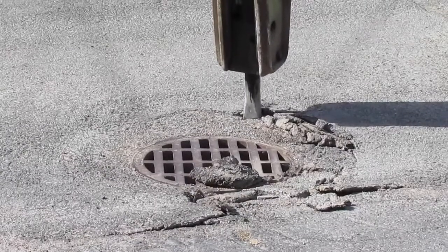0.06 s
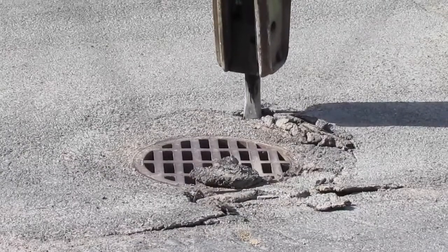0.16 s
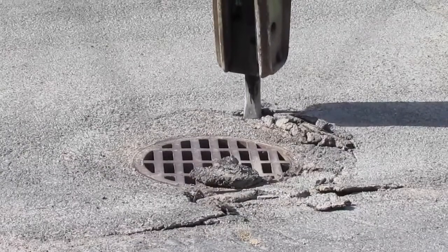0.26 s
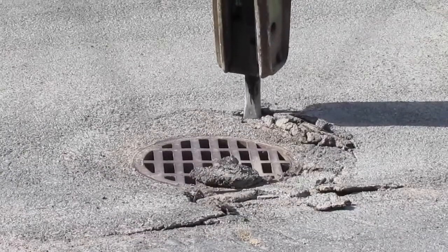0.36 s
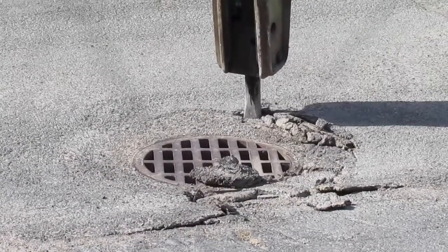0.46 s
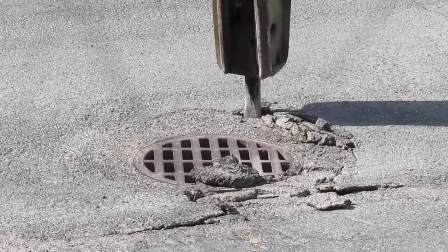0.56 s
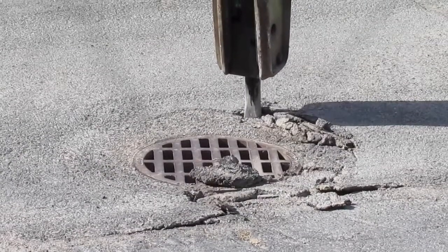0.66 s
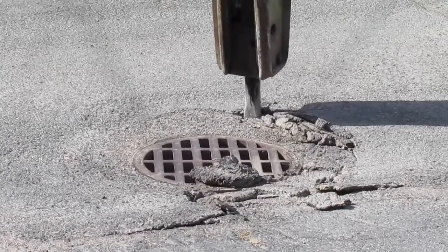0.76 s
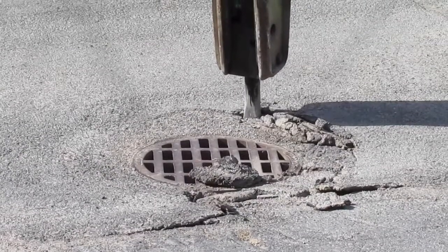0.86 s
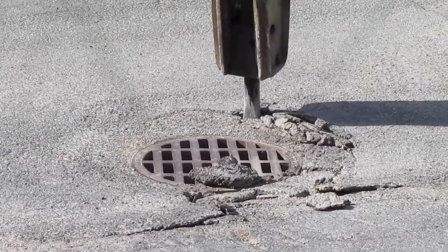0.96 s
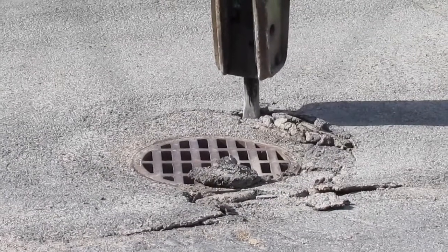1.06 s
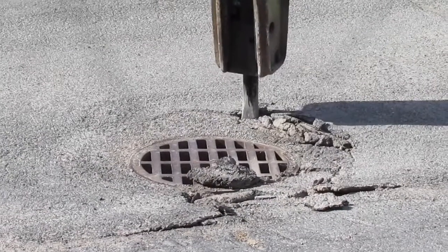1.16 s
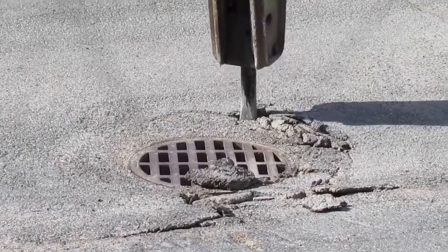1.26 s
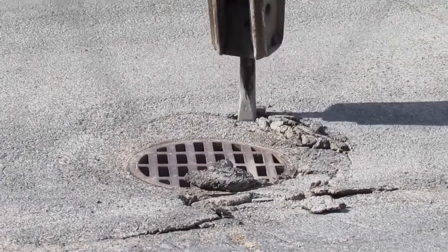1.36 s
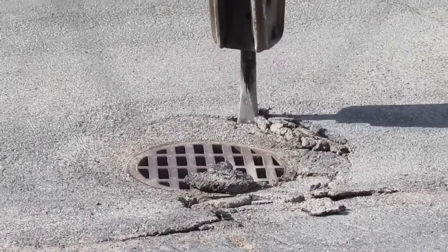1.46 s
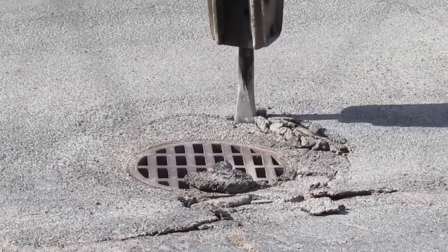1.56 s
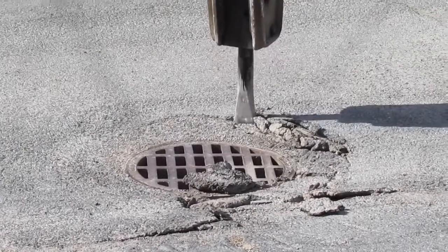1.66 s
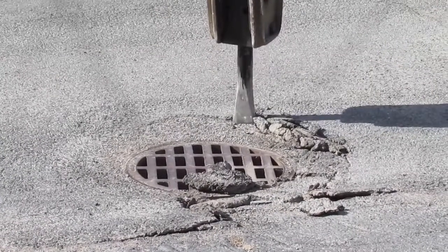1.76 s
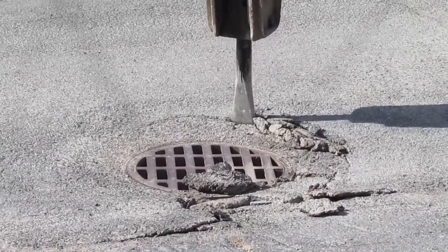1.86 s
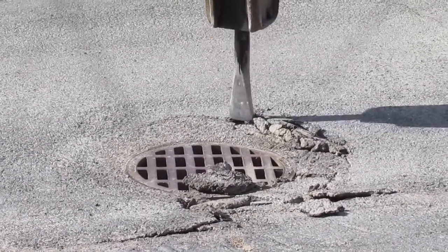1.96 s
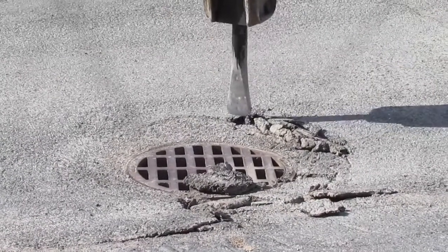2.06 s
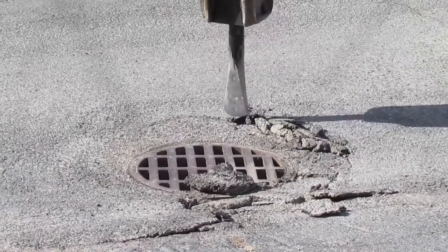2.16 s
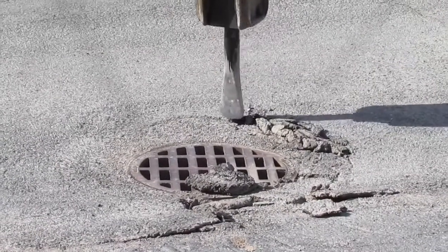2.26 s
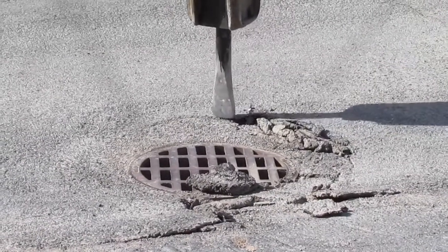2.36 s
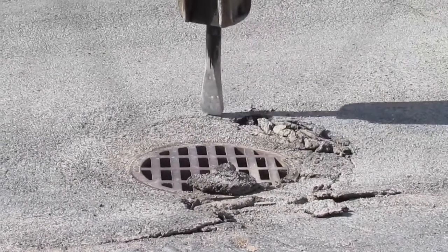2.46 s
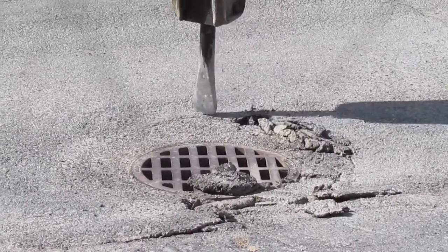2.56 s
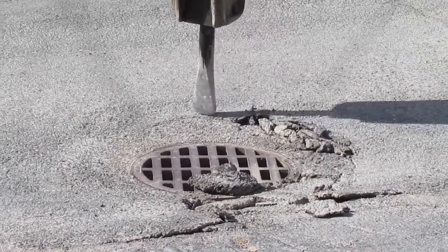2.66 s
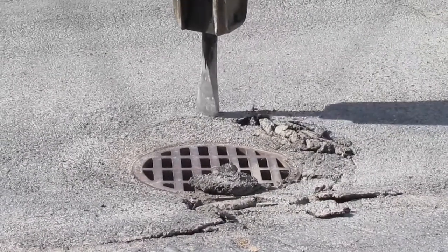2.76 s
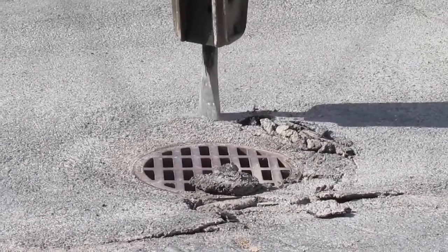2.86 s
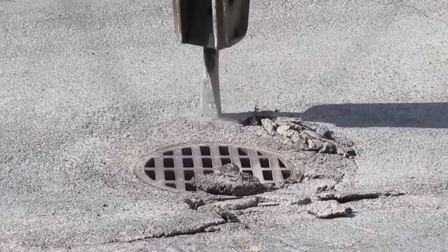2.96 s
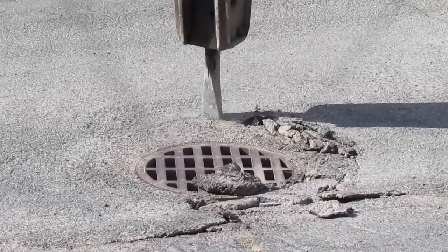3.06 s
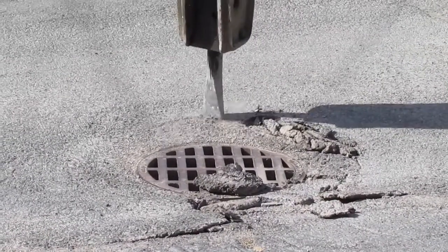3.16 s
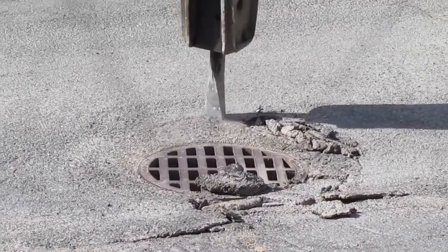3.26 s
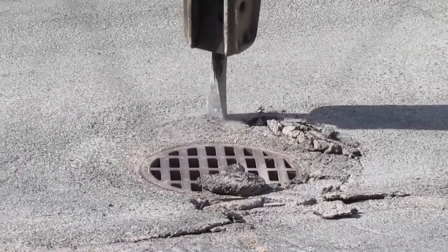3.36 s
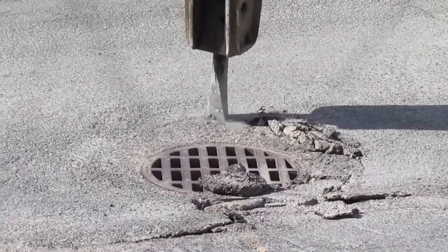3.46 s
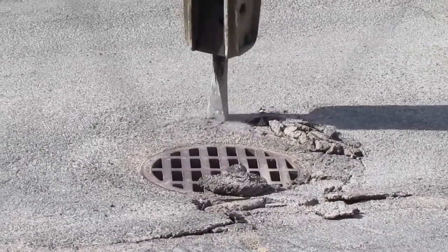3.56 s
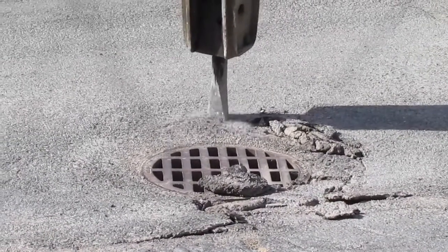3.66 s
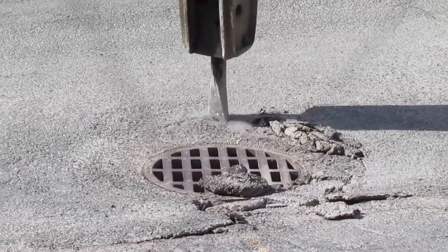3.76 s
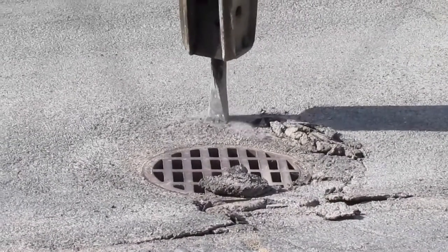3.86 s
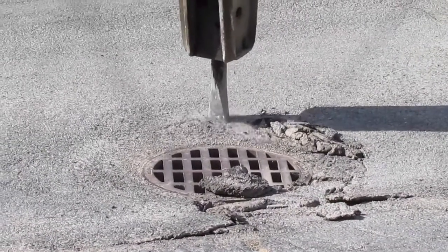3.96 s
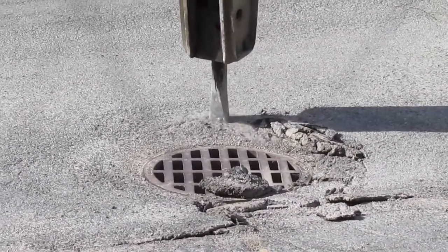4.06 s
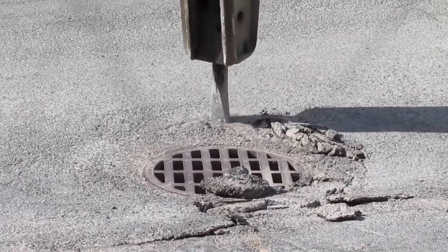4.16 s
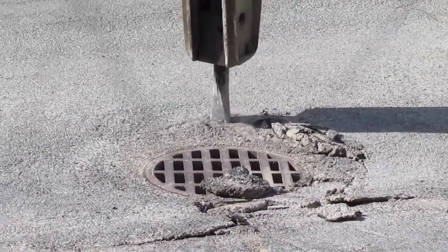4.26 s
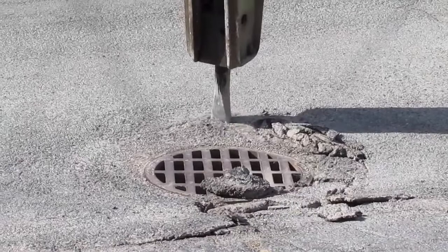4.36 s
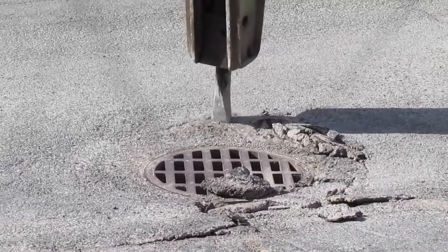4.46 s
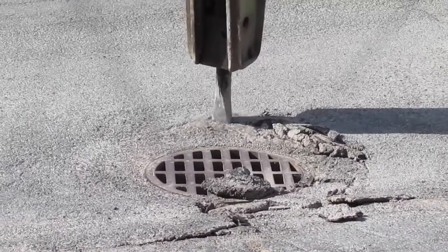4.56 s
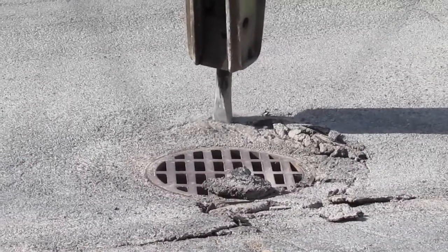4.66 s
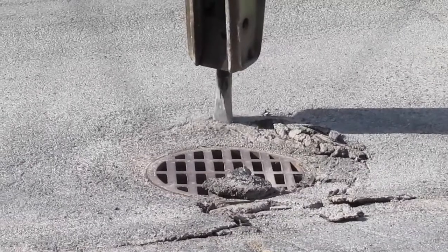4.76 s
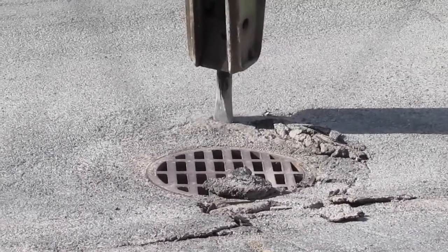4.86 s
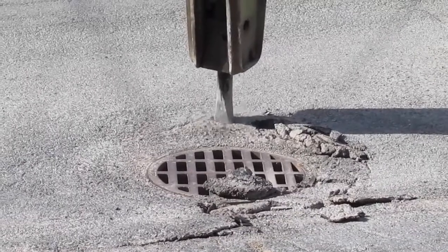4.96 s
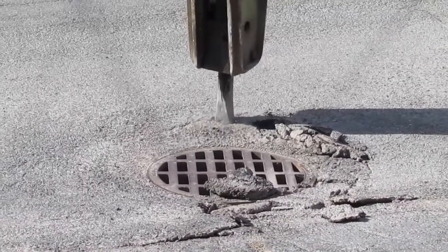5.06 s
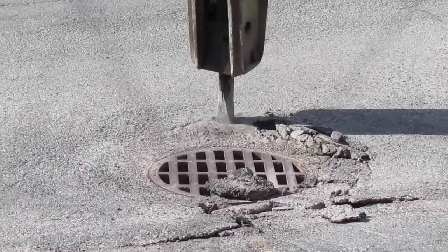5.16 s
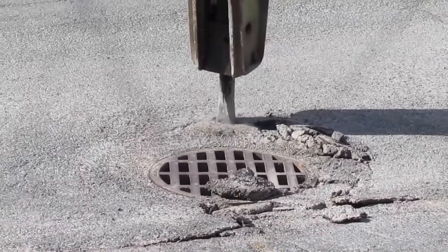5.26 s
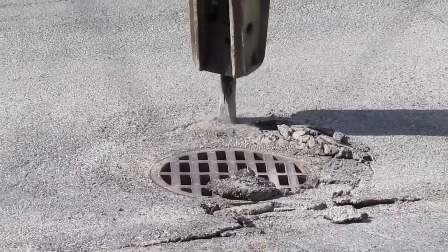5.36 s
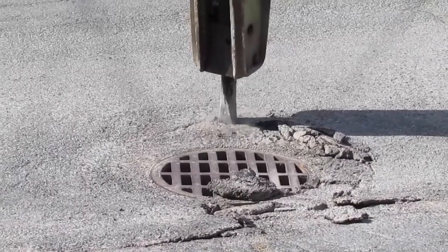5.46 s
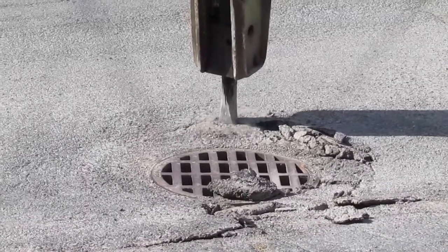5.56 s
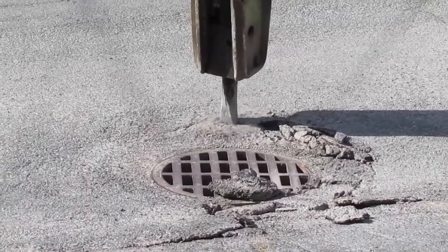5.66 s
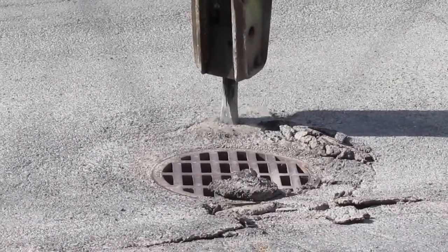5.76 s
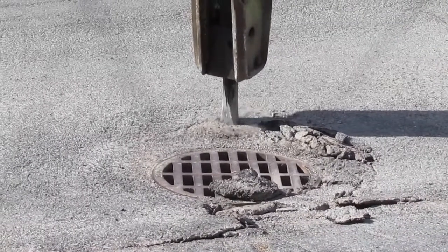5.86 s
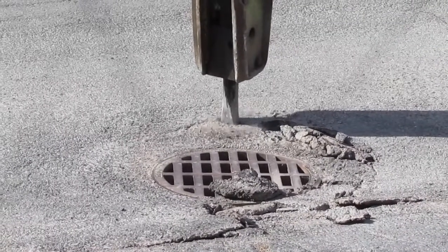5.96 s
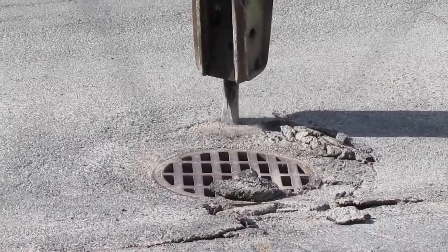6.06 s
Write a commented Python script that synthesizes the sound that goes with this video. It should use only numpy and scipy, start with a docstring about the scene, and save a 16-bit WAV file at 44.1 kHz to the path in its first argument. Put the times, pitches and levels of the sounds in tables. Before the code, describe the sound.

A hydraulic jackhammer is already pounding a road, about eleven sharp, ringing steel blows a second, each with a short street echo. It stops at about 0.7 seconds, leaving the much quieter hum and clatter of a diesel engine with a faint hydraulic hiss. Between 0.7 and 1.4 seconds the machine's arm gives a few dull metal knocks, while small stones and sand trickle lightly. A couple more stones drop just after 2 seconds, and two more knocks come near 2.5 seconds. Low wind buffets the microphone from around 1.9 seconds, peaking near 2.7 as the engine hum swells. At 2.8 seconds the chisel comes down with a clank and the hammering resumes over a crunch of breaking asphalt. The crunch fades by about 4.5 seconds, while the loud, even pounding continues to the end at around 6 seconds.

```python
"""Hydraulic breaker on asphalt

A breaker on an excavator arm pounds a chisel into the road, stops, lifts, moves and starts again.
Each blow rings the housing and the chisel in nearly the same way, drifting as the chisel sinks. Between
bursts the diesel hums, grit trickles, the arm's pins knock and wind buffets the microphone ports."""
import sys
import numpy as np
from scipy import signal
from scipy.fft import rfft, irfft, next_fast_len
from scipy.io import wavfile
from scipy.ndimage import uniform_filter1d, map_coordinates

SR = 44100
rng = np.random.default_rng(int(sys.argv[2]) if len(sys.argv) > 2 else 0)


def wav_record(signal):
    """Record a signal, one row per channel, as 16-bit PCM in the file named by sys.argv[1]."""
    frames = np.transpose(np.atleast_2d(signal))
    bounded = np.clip(frames, -1, 1)
    # unit amplitude maps onto the largest positive 16-bit level
    quanta = np.round(bounded * 32767).astype(np.int16)
    wavfile.write(sys.argv[1], SR, quanta)


N = 269451


def amp(db):
    return 10 ** (np.asarray(db) / 20)


def unit(x):
    return x / np.sqrt(np.mean(x ** 2) + 1e-20)


def along(points, hz):
    """Reads (frequency, value) points on a log axis."""
    freqs, values = np.transpose(points)
    return np.interp(np.log(hz + 1), np.log(freqs + 1), values)


def curves(rows):
    """One automation curve for each column after the time."""
    times, *columns = np.transpose(rows)
    return [np.interp(np.arange(N) / SR, times, column) for column in columns]


def wobble(rate):
    """A smooth random curve, rate knots a second."""
    return map_coordinates(rng.standard_normal(int(N * rate / SR) + 4), [np.arange(N) * rate / SR])


def filtered(x, response):
    """Zero-phase EQ; response gives the gain at each frequency."""
    size = next_fast_len(x.shape[-1] + 2048)
    return irfft(rfft(x, size) * response(np.fft.rfftfreq(size, 1 / SR)), size)[..., :x.shape[-1]]


def coloured(x, spectrum):
    return unit(filtered(x, lambda hz: amp(along(spectrum, hz))))


def drifting(size, keep):
    """Random rows, each keeping a share of the one before."""
    rows = rng.standard_normal(size)
    rows[1:] *= np.sqrt(1 - keep ** 2)
    return signal.lfilter([1], [1, -keep], rows, axis=0)


def fade(t, rise, t60):
    """Attack from t = 0, decaying 60 dB in t60 seconds."""
    t = np.maximum(t, 0)
    return (1 - np.exp(-t / rise)) * amp(-60 * t / t60)


def placed(times, sounds):
    """Lays each row of sounds on the timeline."""
    at = np.round(times * SR).astype(int)[:, None] + np.arange(sounds.shape[1])
    return np.bincount(at.ravel(), sounds.ravel(), N + sounds.shape[1])[:N]


# Stereo image of the noise beds: (frequency [Hz], left-right correlation [0-1])
BED_LIKENESS = [(60, 0.69), (150, 1), (380, 0.95), (950, 1), (2380, 0.77), (5980, 0.69), (15000, 0.3)]


def rush(spectrum, patchy_db):
    """Stereo noise bed of rms 1, mottled in time and frequency."""
    bins = signal.stft(rng.standard_normal((2, N)), nperseg=512)[2]
    patches = uniform_filter1d(uniform_filter1d(rng.standard_normal(bins.shape[1:]), 6, 0), 12, 1)
    pair = signal.istft(bins * amp(patchy_db * unit(patches)), nperseg=512)[1][:, :N]
    width = lambda hz: np.arccos(along(BED_LIKENESS, hz)) / 2
    eq = lambda hz: amp(along(spectrum, hz)) * [np.cos(width(hz)), np.sin(width(hz))]
    mid, side = filtered(pair, eq)
    return unit(np.array([mid + side, mid - side]))


# Diesel faders: (time [s], hum [dB], clatter [dB])
ENGINE_LEVELS = [(0, -47.5, -33.5), (.3, -46, -36.5), (.6, -47, -36), (.75, -47, -43), (.95, -43.5, -41.5),
                 (1.3, -41.5, -39.5), (1.87, -41.5, -38.5), (2.55, -37.5, -36.5), (2.68, -34, -35.5),
                 (2.81, -41, -34), (3, -49, -32.5), (3.5, -47, -39), (4.4, -47.5, -38), (6.11, -47.5, -44)]
# Hydraulic pump tone: (time [s], pitch [Hz], level [dB])
PUMP_TONE = [(0, 316.2, -54), (0.75, 318.7, -52.5), (0.91, 323.7, -47.5), (1.21, 307, -54),
             (1.43, 306.8, -44), (1.5, 313.4, -55), (1.74, 309, -49), (1.91, 307.9, -48.5),
             (2.31, 319.2, -42.5), (2.74, 319.4, -39), (2.82, 316, -47), (3.6, 316, -52), (4.5, 317, -57),
             (6.11, 319.3, -55)]
# Partials of fan, pump and firing, a list each: (ratio to pump pitch, gain [dB])
SHAFT_ORDERS = [
    [(.566, 0)],
    [(1, 1.5), (2, -9), (2.5, -10), (3, -10)],
    [(1 / 3, 0), (1 / 6, -5), (2 / 3, -5)],
]
# EQs of diesel rumble, diesel clatter and hydraulic hiss: (frequency [Hz], gain [dB])
RUMBLE_EQ = [(60, -13), (110, -3.5), (200, -2.5), (330, 1.5), (460, -7.5), (600, -56)]
CLATTER_EQ = [(280, -56), (480, -8), (601, -2.5), (907, 0.5), (978, -5), (1260, -4.5), (2110, -9.5),
              (2870, -9), (3730, -20.5), (4500, -20.5), (5850, -58), (9900, -120)]
HISS_EQ = [(2500, -11), (3500, -26.5), (4500, 3.5), (7600, 8), (9500, 3.5), (12500, 6.5), (13400, -8),
           (14200, -28), (15000, -60)]


def engine():
    """Tones tied to one shaft speed, over the diesel's rumble and clatter and the hydraulics' hiss."""
    hum_db, clatter_db = curves(ENGINE_LEVELS)
    pump_hz, pump_db = curves(PUMP_TONE)
    firing_db = hum_db - 6.5
    cycles = np.cumsum(pump_hz) / SR
    tones = 0
    for db, orders in zip((hum_db, pump_db, firing_db), SHAFT_ORDERS):
        for ratio, gain_db in orders:
            peak = np.sqrt(2) * amp(db + gain_db + 0.58 * wobble(12))
            tones += peak * np.sin(2 * np.pi * (ratio * cycles + .08 * wobble(6)))
    rumble = amp(clatter_db - 6.5 + 0.16 * (hum_db - hum_db.mean())) * rush(RUMBLE_EQ, patchy_db=4)
    clatter = amp(clatter_db + .3 * wobble(12)) * rush(CLATTER_EQ, patchy_db=.7)
    hiss = amp(clatter_db - 9.5 + .6 * wobble(25)) * rush(HISS_EQ, patchy_db=.8)
    return tones + rumble + clatter + hiss


# Wind fader: (time [s], level [dB])
WIND_LEVEL = [(0, -45.5), (.63, -46), (.75, -55), (1.29, -55), (1.72, -51), (1.89, -40.5), (2.01, -41),
              (2.06, -35), (2.13, -38), (2.25, -37), (2.38, -38.5), (2.57, -35), (2.65, -29.5), (2.72, -30),
              (2.78, -43), (3.06, -56), (3.8, -45.5), (4.1, -45.5), (4.45, -45), (4.55, -53), (5.7, -63),
              (5.9, -49), (6.11, -57)]
# Low-end EQ of the buffeting: (frequency [Hz], gain [dB])
WIND_EQ = [(15, -50), (28, -41), (55, -7.5), (100, -14.5), (200, -14.5), (350, -27.5), (700, -53)]
PAN = np.array([[.5], [-.5]])  # splits a left-over-right gain in dB between the channels


def wind():
    """Gusts buffet the two ports mostly independently, leaning left as they grow."""
    buffet_db = curves(WIND_LEVEL)[0] + 1.2 * wobble(7.9)
    pan_db = .45 * (buffet_db + 54)  # centred at -54 dB
    shared, left, right = coloured(rng.standard_normal((3, N)), WIND_EQ)
    lumps = amp(2.2 * np.array([wobble(14), wobble(14)]))
    return amp(buffet_db + pan_db * PAN) * unit(lumps * [0.6 * shared + left, 0.6 * shared + right])


# Piston hits: (time [s], strength [dB], chisel ring [dB], collar ring [dB])
PISTON_BLOWS = [(0.0166, -9, -23, -37), (0.1034, -9, -26, -36), (0.1911, -9, -29, -38),
                (0.2777, -9, -43, -36), (0.3646, -9, -29, -28), (0.4525, -9, -33, -36),
                (0.54, -9, -28, -36), (0.6248, -9, -32, -21.5), (2.8569, -10, -37, -27),
                (2.9173, -9, -38, -34), (2.9824, -9.5, -46, -38), (3.056, -9, -44, -38),
                (3.134, -9, -38, -36), (3.2147, -9, -32, -30), (3.2965, -9.5, -42, -36),
                (3.38, -10, -40, -38), (3.462, -9.5, -35, -40), (3.546, -10.5, -28, -36),
                (3.6288, -9, -36, -36), (3.712, -9.5, -20, -21), (3.7958, -9, -25, -38),
                (3.8814, -9, -34, -32), (3.967, -8.5, -40, -40), (4.0535, -8.5, -31, -36),
                (4.1409, -9, -26, -27), (4.2298, -9, -32, -40), (4.3172, -9.5, -27, -36),
                (4.4063, -10, -36, -36), (4.495, -9.5, -36, -36), (4.584, -10, -25, -30),
                (4.6737, -10, -36, -30), (4.7625, -10, -28, -34), (4.8508, -9.5, -26, -40),
                (4.94, -10, -31, -33), (5.029, -10, -25, -34), (5.1164, -10, -36, -36),
                (5.2031, -10, -43, -34), (5.2921, -9.5, -38, -33), (5.3797, -10.5, -32, -40),
                (5.4673, -10, -21, -38), (5.5535, -10.5, -31, -40), (5.6429, -9.5, -37, -36),
                (5.7317, -10, -27, -32), (5.8212, -9.5, -36, -26), (5.913, -9.5, -29, -24),
                (6.0029, -10.5, -29, -24)]
# How firmly the chisel sits: (time [s], seating [0-1], housing ring [dB])
CHISEL_SEATING = [(0, 0.48, -7), (.25, 0.73, -9.5), (.65, 0.51, -8.5), (2.85, 0.83, -18),
                  (3.06, 0.11, -9.5), (3.35, 0, -11), (3.7, 0.24, -9), (4.1, 0.53, -14), (4.33, 0.53, -8),
                  (5.05, 0.88, -6), (6.1, 0.98, -14.5)]
# The chisel touches down and skids: (time [s], strength [dB], chisel ring [dB], collar ring [dB],
# housing pitch [Hz], housing ring [dB], ground plate [dB], snap [dB], recoil [dB], valve [dB])
TOUCHDOWN = [(2.7701, -19, -29, -36, 688, -10, -10.5, -8, -31, -18),
             (2.803, -7, -32, -36, 675, -11, -36, -21, -13, -36),
             (2.828, -12.5, -32, -36, 700, -9, -37, -1, -6, -31)]
# Each pair runs from loose chisel to seated chisel.
HOUSING_HZ, PLATE_DB, SNAP_DB, RECOIL_DB = (745, 782), (-37.5, -11), (-4, -6.5), (-20, -17.5)


def contacts():
    """Cue list of all hits, laid out like TOUCHDOWN; seating and chance set a blow's pitch and mix."""
    times, *levels = np.transpose(PISTON_BLOWS)
    seat, housing = (curve[np.round(times * SR).astype(int)] for curve in curves(CHISEL_SEATING))
    ranges = HOUSING_HZ, PLATE_DB, SNAP_DB, RECOIL_DB
    hz, plate, snap, recoil = (loose + seat * (firm - loose) for loose, firm in ranges)
    valve = np.full(len(times), -19.5)
    timbre = np.transpose([hz, housing, plate, snap, recoil, valve])
    timbre += rng.standard_normal(timbre.shape) * [6, 1.1, 1.1, 1.1, 1.1, 2.5]  # Hz, then dB
    rows = np.vstack([np.column_stack([times, *levels, timbre]), TOUCHDOWN])
    return rows[np.argsort(rows[:, 0])]


def dense(spectrum, shape, keep):
    """Modes too many to tell apart: one row of noise per hit, each resembling the last."""
    return coloured(drifting(shape, keep), spectrum)


def ring(modes, t, count, rise, slip_rad):
    """Modes of one object for count hits; level and phase drift from hit to hit."""
    out = 0
    for hz, db, t60 in modes:
        level, phase = drifting((count, 2), keep=0.6).T[:, :, None]
        out += amp(db + 1.5 * level) * fade(t, rise, t60) * np.sin(2 * np.pi * hz * t + slip_rad * phase)
    return out


# EQs of valve tick, crack, steel-on-steel snap, clang and recoil rattle: (frequency [Hz], gain [dB])
TICK_EQ = [(4000, -32), (6000, 13), (8500, 5), (11500, 2.5), (14000, -28), (16000, -40)]
CRACK_EQ = [(530, -19), (900, -1.5), (1200, -10), (1610, 0), (2420, -0.5), (2700, -2.5), (3510, -10.5),
            (3780, -23.5), (4500, -10.5), (5850, -67), (9900, -120)]
SNAP_EQ = [(2350, -61), (4000, -18), (5740, -6), (6350, -0.5), (7190, -5.5), (9560, -6.5), (10900, -3),
           (13700, -16), (15600, -20), (16500, -57)]
CLANG_EQ = [(210, -35), (350, -23), (607, -12.5), (740, -2.5), (870, -3), (1210, -10.5), (1560, -8),
            (1740, -5), (3760, -14.5), (4760, -18), (4990, -16), (13600, -31), (15000, -54)]
RATTLE_EQ = [(3000, -59), (5000, -0.5), (6500, 10), (9000, 2), (12000, -0.5), (13800, -6), (15000, -35)]
# Pan of the direct hit: (frequency [Hz], left over right [dB])
BREAKER_PAN = [(60, 0.5), (200, 0), (700, -0.1), (1290, -0.2), (2380, -2.3), (4400, -1.5), (8120, -0.5),
               (15000, -1)]
VALVE_LEAD_S, REBOUND_S = .0045, .021  # valve ticks before the hit; chisel falls back on its pin after


def breaker():
    """Each blow: the valve ticks, the piston strikes, the road thumps, steel rings and recoils."""
    times, db, chisel_db, collar_db, *timbre = contacts().T[:, :, None]
    housing_hz, housing_db, plate_db, snap_db, recoil_db, valve_db = timbre
    t = np.arange(SR // 4) / SR - VALVE_LEAD_S
    shape = len(times), len(t)
    tick = amp(valve_db) * dense(TICK_EQ, shape, keep=0.9) * fade(t + VALVE_LEAD_S, 0.00079, 0.15)
    crack = dense(CRACK_EQ, shape, keep=0.86) * fade(t, 0.00095, 0.063) * burst(t, 0.017)
    chatter = unit(amp(2.25 * unit(uniform_filter1d(drifting(shape, keep=.99), 40))))  # spiky contact
    snap_envelope = fade(t, 0.00028, 0.063) * burst(t, 0.0086) + amp(-14) * fade(t, 0.0021, 0.11)
    snap = amp(snap_db) * chatter * dense(SNAP_EQ, shape, keep=0.74) * snap_envelope
    clang = amp(-12) * dense(CLANG_EQ, shape, keep=0.47) * fade(t, 0.012, 0.22)
    thump = amp(-19) * burst(t - .007, 0.0062) * np.sin(2 * np.pi * 255 * t)  # one push on the slab
    rattle = amp(recoil_db) * chatter * dense(RATTLE_EQ, shape, keep=0.18)
    rattle *= fade(t - REBOUND_S, 0.0018, 0.09)
    housing = housing_ring(t, housing_hz, housing_db, plate_db)
    steel = chisel_ring(t, times, chisel_db, collar_db)
    direct = tick + crack + snap + clang + thump + rattle + housing + steel
    echo = street_echo(t, steel, snap_db, recoil_db)
    mid, side = (placed(times[:, 0] - VALVE_LEAD_S, amp(db) * part) for part in (direct, echo))
    return filtered(np.array([mid, mid]), lambda hz: amp(along(BREAKER_PAN, hz) * PAN)) + [side, -side]


def burst(t, hold):
    """Bell-shaped gate: a stress wave runs to and fro, then is spent."""
    return np.exp(-(t / hold) ** 2)


# Modes of the housing plates: (frequency [Hz], level [dB], t60 [s])
HOUSING_MODES = [(1089, -7.5, 0.12), (1207, -9.5, 0.2), (1331, 0.5, 0.095), (1468, -6.5, 0.12),
                 (1708, 3.5, 0.086), (1920, 4.5, 0.086), (2053, 5, 0.048), (2186, 0, 0.14),
                 (2390, -3, 0.14), (2502, 1.5, 0.11), (2840, -14, 0.3), (2966, -17, 0.22),
                 (2954, 9.5, 0.043)]


def housing_ring(t, hz, housing_db, plate_db):
    """The housing rings at the blow and again as it jumps back on its mounts; the plates ring along."""
    bounce = fade(t, 0.0017, 0.035) + 1.93 * fade(t - .012, 0.0029, 0.057)
    body = amp(housing_db) * bounce * np.sin(2 * np.pi * hz * t)
    plate_envelope = fade(t, 0.0015, 0.3) + 1.5 * fade(t, 0.0015, 0.07)
    ground_plate = amp(plate_db) * plate_envelope * np.sin(2 * np.pi * 869 * t)
    return body + ground_plate + amp(-11) * ring(HOUSING_MODES, t, len(hz), rise=0.0087, slip_rad=0.99)


# Return EQ of the street echo: (frequency [Hz], gain [dB])
ECHO_EQ = [(60, -17), (92, -11), (140, -16), (210, -22), (330, -32), (500, -31), (770, -31), (1170, -28),
           (1790, -14), (2740, -11.5), (4190, -10.5), (6410, -13), (9810, -5.5), (15000, -26)]


def street_echo(t, steel, snap_db, recoil_db):
    """Reflections reach the two ports differently and give each hit its width."""
    shape = steel.shape
    slap = dense(CRACK_EQ, shape, keep=0.46) + amp(snap_db + 5.5) * dense(SNAP_EQ, shape, keep=0.73)
    slap *= fade(t, 0.0014, 0.038) * burst(t, 0.0085)
    late_wall = 0.36 * fade(t - .03, 0.0099, 0.17)
    tail = amp(-11) * dense(CLANG_EQ, shape, keep=0.33) * (fade(t, 0.0013, 0.47) + late_wall)
    rattle = amp(recoil_db + 1.5) * dense(RATTLE_EQ, shape, keep=.3) * fade(t - REBOUND_S, .003, 0.12)
    return filtered(slap + tail + amp(-5) * steel + rattle, lambda hz: amp(along(ECHO_EQ, hz)))


# Lengthwise chisel modes, and collar modes: (frequency [Hz], level [dB], t60 [s])
CHISEL_MODES = [(4716, -4, .5), (4728, -12, .3), (7550, -11, .4), (13150, -15, .3)]
COLLAR_MODES = [(8624, 0, .25), (9300, -12, .15), (14300, -14, .1)]


def chisel_ring(t, times, chisel_db, collar_db):
    """Chisel and collar ring on the rebound, fluttering in a loose fit till the piston damps them."""
    steel = sum(amp(db) * ring(modes, t - REBOUND_S, len(times), rise=.004, slip_rad=2.5)
                for db, modes in ((chisel_db, CHISEL_MODES), (collar_db, COLLAR_MODES)))
    flutter = amp(3 * unit(uniform_filter1d(rng.standard_normal(steel.shape), 500)))
    piston_return_s = np.minimum(np.diff(times, axis=0, append=np.inf), .11)
    return steel * flutter * np.clip((piston_return_s - t) / .006, 0, 1)


# Pin knocks: (time [s], level [dB], low ring [Hz], high ring [Hz], high over low [dB], t60 [s])
PIN_KNOCKS = [(.725, -32.5, 710, 1370, -16, 0.22), (.855, -38, 680, 1400, 15, 0.044),
              (1.194, -27.5, 648, 1376, 1, 0.094), (1.21, -25, 730, 1170, -3, 0.056),
              (1.275, -32.5, 680, 1356, -2, 0.14), (1.308, -23, 730, 1220, 0, 0.087),
              (2.432, -30.5, 912, 1370, 0, 0.09), (2.471, -25, 810, 1130, -3, 0.056),
              (2.833, -9.5, 582, 724, 1, 0.061)]


def arm_pins():
    """Loose pins knock dully as the arm shifts: two rings and a rattle of the housing plates."""
    times, db, low_hz, high_hz, high_db, t60 = np.transpose(PIN_KNOCKS)[:, :, None]
    t = np.arange(SR // 5) / SR
    rattle = coloured(rng.standard_normal((len(times), len(t))), CLANG_EQ)
    rings = np.sin(2 * np.pi * low_hz * t) + amp(high_db) * np.sin(2 * np.pi * high_hz * t)
    return placed(times[:, 0], amp(db) * (rings + 0.71 * rattle) * fade(t, 0.0034, t60))


# Stones dropping: (time [s], level [dB], EQ peak [Hz])
STONE_DROPS = [(0.9163, -34, 9490), (0.9557, -36, 7960), (0.9877, -30, 4100), (1.069, -35, 10700),
               (1.1066, -30, 10200), (1.129, -33, 4560), (1.2, -34, 5810), (1.267, -35, 7460),
               (1.3494, -34, 10700), (1.3844, -34, 4990), (1.4066, -31.5, 6960), (2.1478, -32, 7500),
               (2.1694, -31, 2400)]
# Fader of the sand running off: (time [s], level [dB])
SAND_LEVEL = [(.86, -77), (.93, -50), (1.05, -43.5), (1.16, -55), (1.33, -46), (1.42, -46), (1.5, -75)]
# Bright EQ of the sand: (frequency [Hz], gain [dB])
SAND_EQ = [(1500, -30), (2500, -3), (4500, 0), (7000, -1.5), (10500, 2.5), (13000, -6), (15000, -40)]


def grit():
    """Stones slide off the chisel in short bright scatters, each its own colour, over running sand."""
    times, db, peak_hz = np.transpose(STONE_DROPS)[:, :, None]
    t = np.arange(SR // 8) / SR
    tint = lambda hz: 0.61 * amp(along(SAND_EQ, hz)) + 1 / (1 + ((hz - peak_hz) / 2600) ** 2)
    shared, left, right = filtered(rng.standard_normal((3, len(times), len(t))), tint)
    envelope = amp(db) * fade(t, 0.0025, t60=0.036)
    stones = [placed(times[:, 0], envelope * noise / noise.std(1, keepdims=True))
              for noise in (shared + left, shared + right)]
    grains = amp(2.5 * wobble(40) + 5 * wobble(500))
    sand = amp(curves(SAND_LEVEL)[0]) * unit(grains * rush(SAND_EQ, patchy_db=3))
    return stones + sand


# Fader of the asphalt breaking: (time [s], level [dB])
CRUNCH_LEVEL = [(2.79, -70), (2.82, -21), (2.9, -24.5), (3.0, -38), (3.2, -28.5), (3.5, -43.5),
                (4.1, -33.5), (4.6, -46), (5, -67)]
# EQ of the rubble: (frequency [Hz], gain [dB])
RUBBLE_EQ = [(240, -23), (400, -15), (734, 6.5), (1010, -24), (1170, -5.5), (3660, -8.5), (8060, -17.5),
             (11400, -19.5), (15000, -36)]


def asphalt():
    """Dense, clumped crunch as the chisel enters fresh surface."""
    clumps = amp(2.5 * wobble(60) + 3 * wobble(300))
    return amp(curves(CRUNCH_LEVEL)[0]) * unit(clumps * rush(RUBBLE_EQ, patchy_db=2.5))


def scene():
    return engine() + wind() + breaker() + arm_pins() + grit() + asphalt()


def record(dry):
    """The input stage soft-clips the highest peaks; a steep low-pass takes off the very top."""
    soft = dry / (1 + np.abs(dry / 0.82) ** 5) ** (1 / 5)
    return filtered(soft, lambda hz: (hz < 16900) / (1 + (hz / 15000) ** 24))


dry = scene()
out = record(dry)
wav_record(out)
```